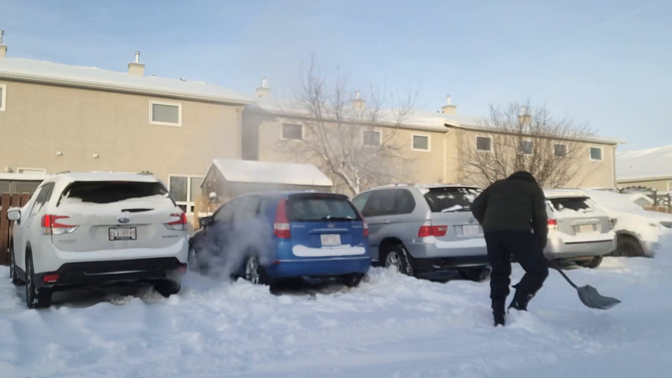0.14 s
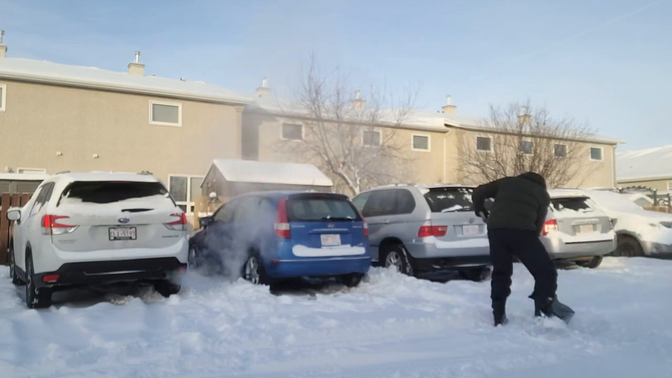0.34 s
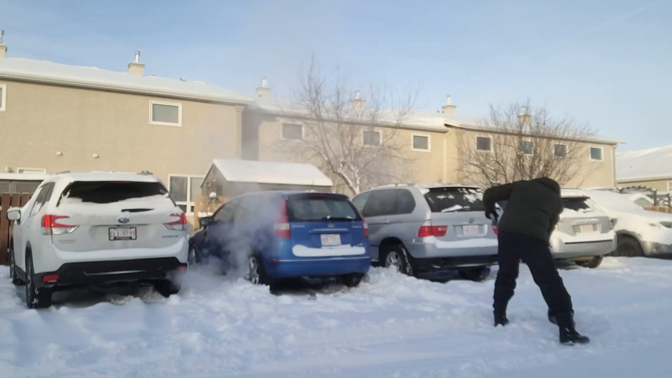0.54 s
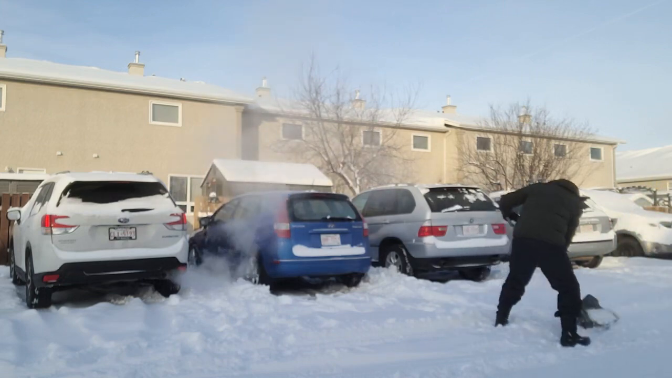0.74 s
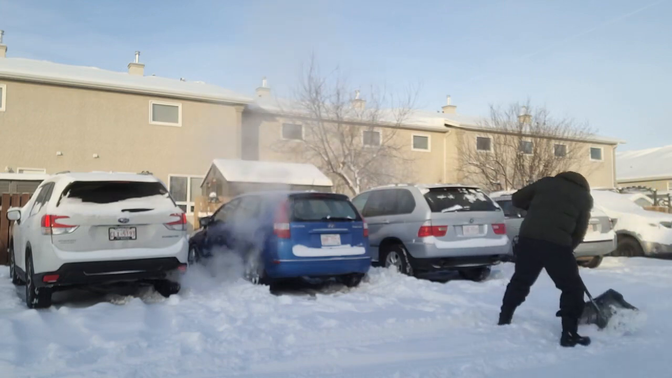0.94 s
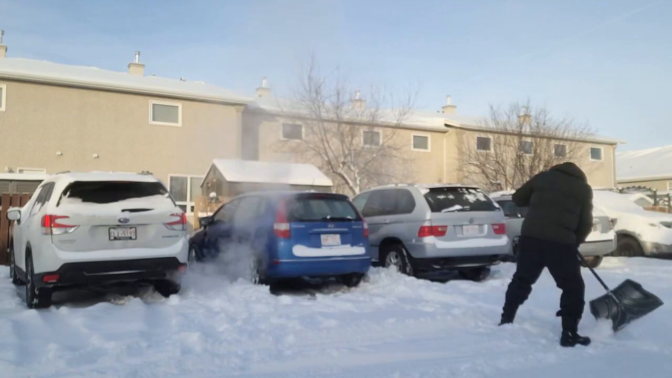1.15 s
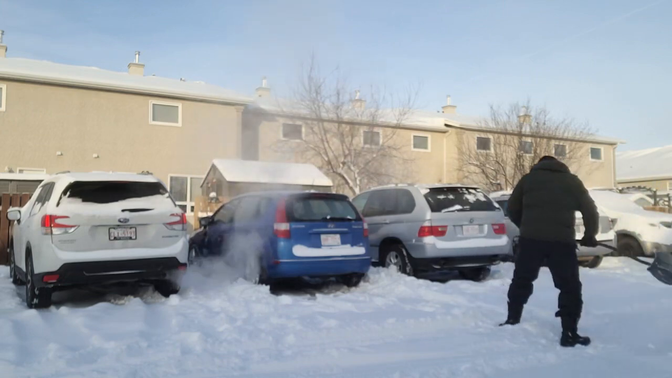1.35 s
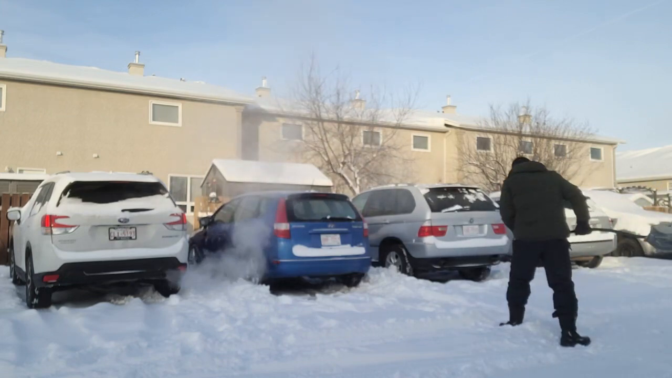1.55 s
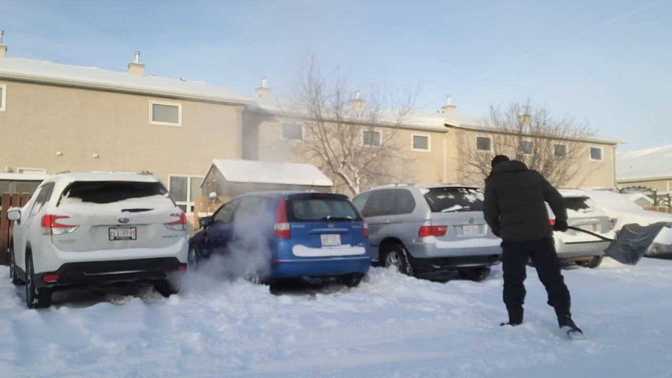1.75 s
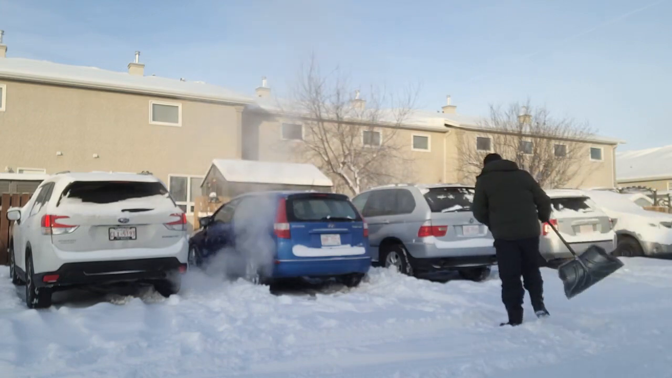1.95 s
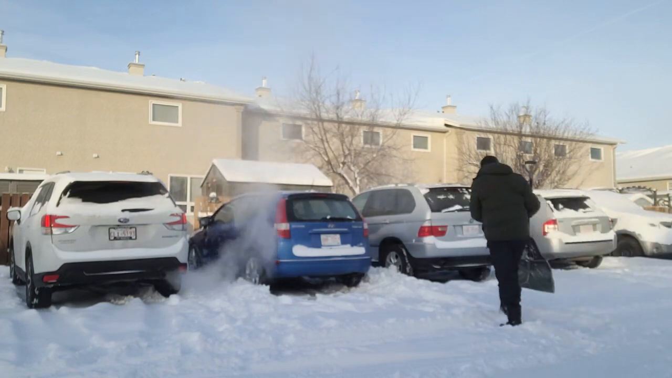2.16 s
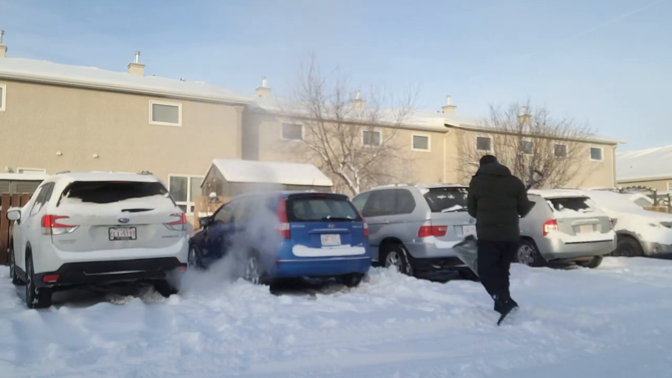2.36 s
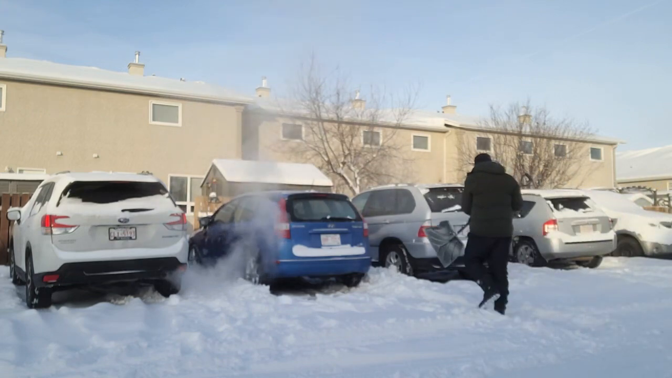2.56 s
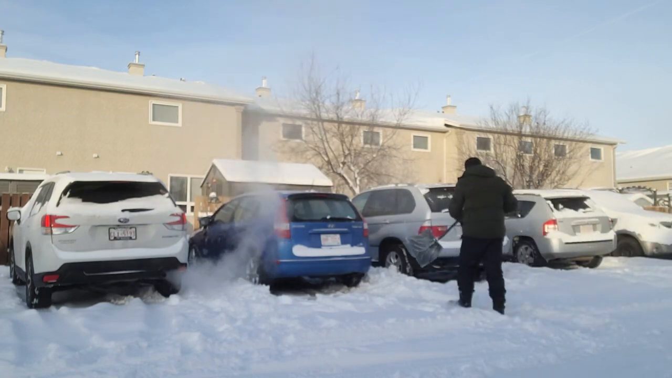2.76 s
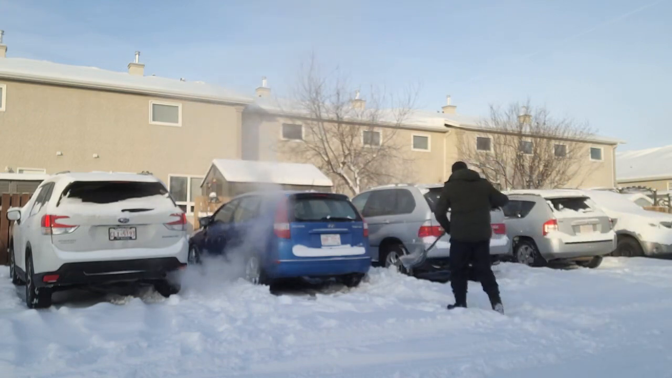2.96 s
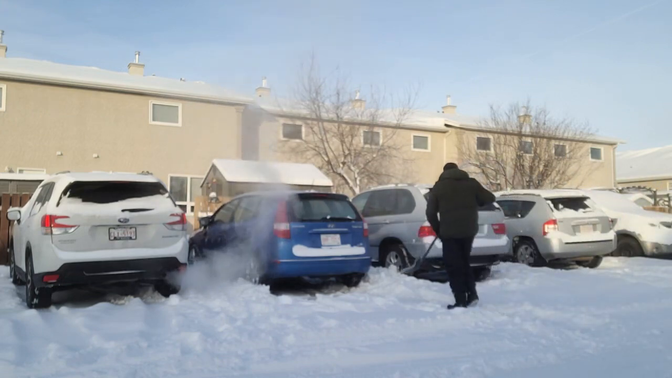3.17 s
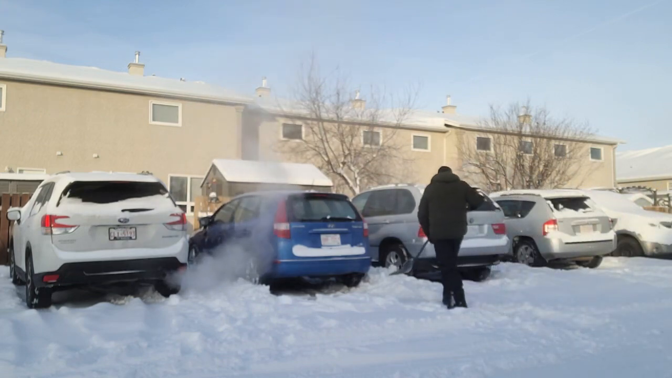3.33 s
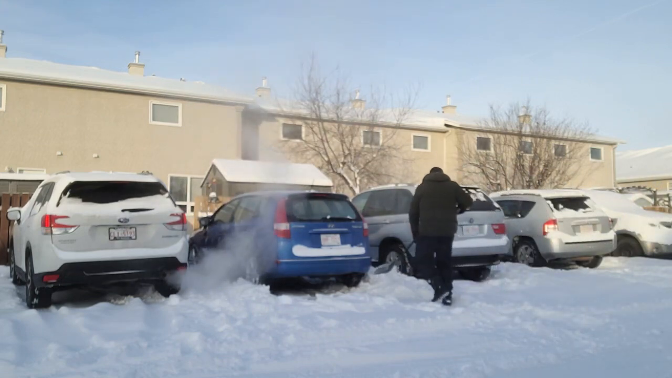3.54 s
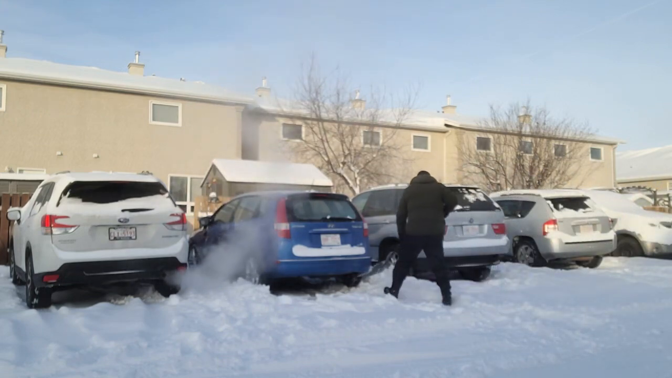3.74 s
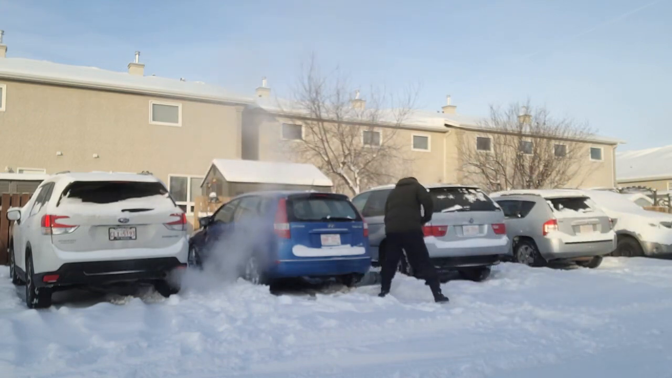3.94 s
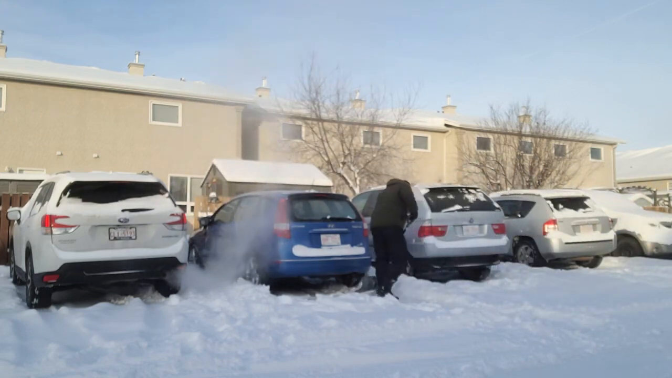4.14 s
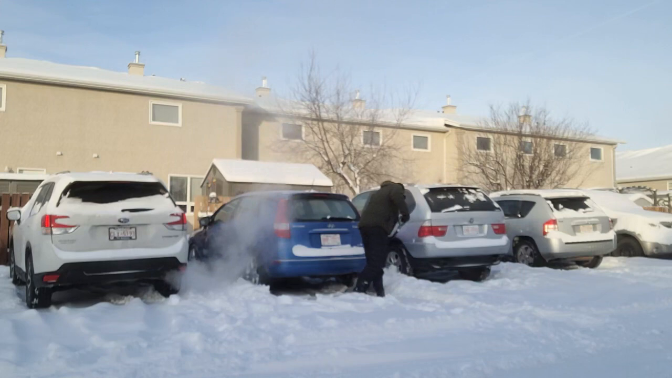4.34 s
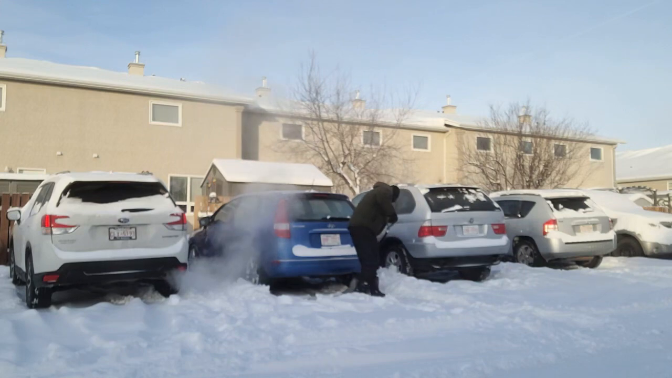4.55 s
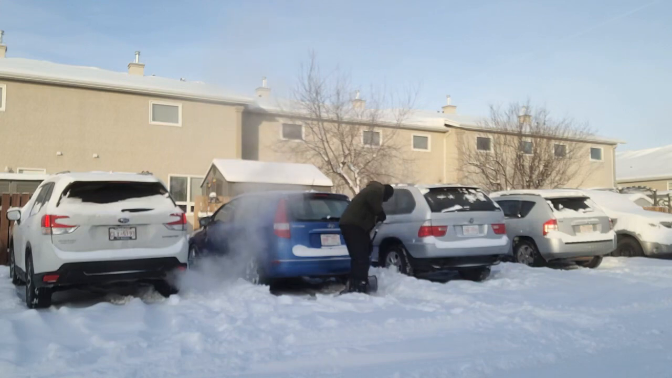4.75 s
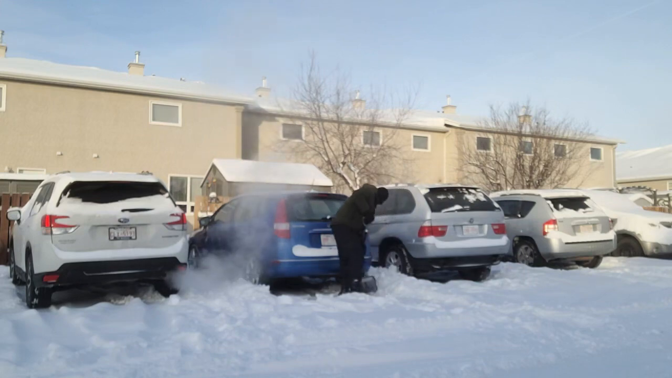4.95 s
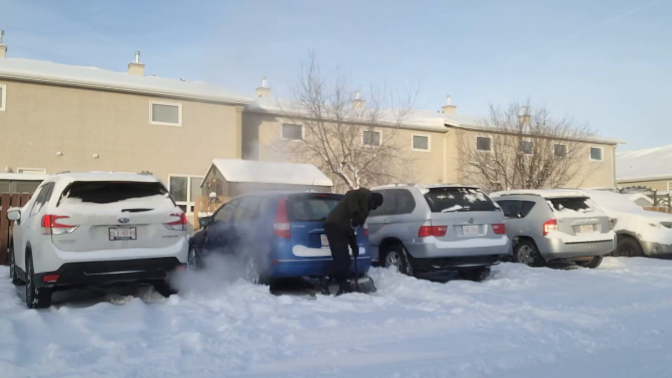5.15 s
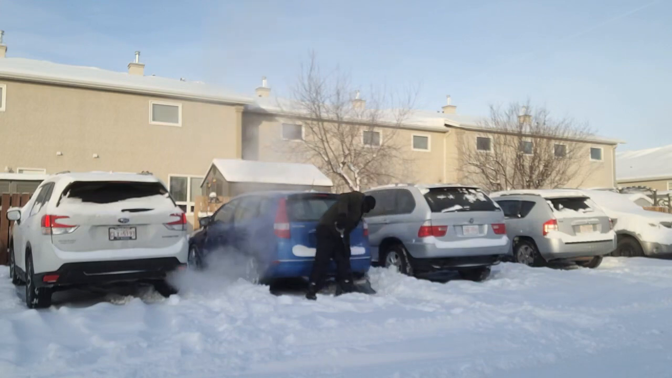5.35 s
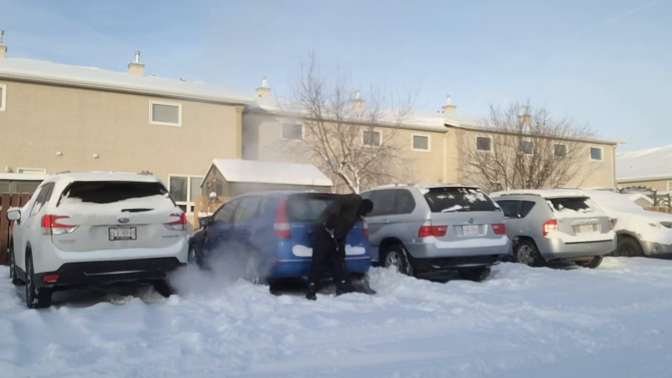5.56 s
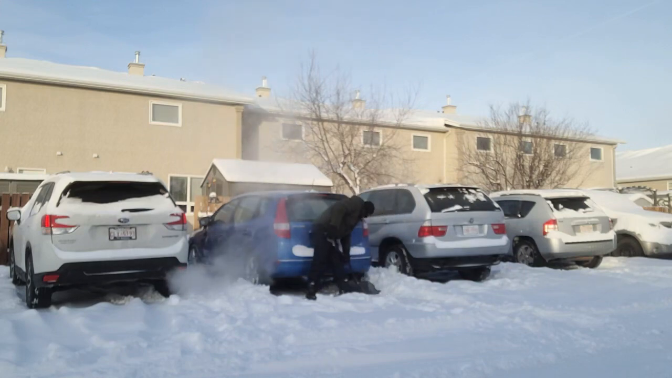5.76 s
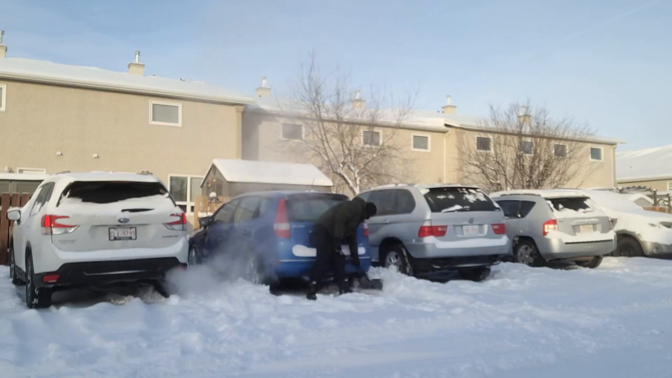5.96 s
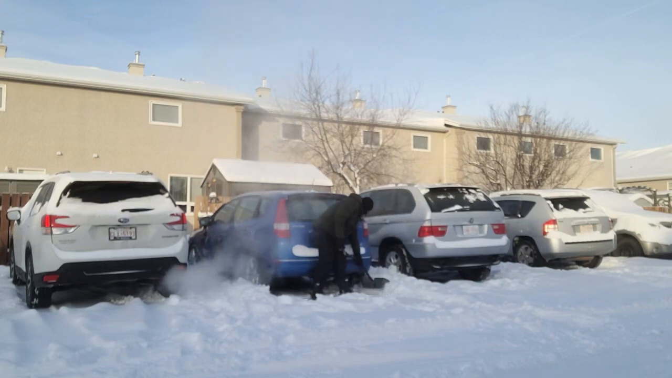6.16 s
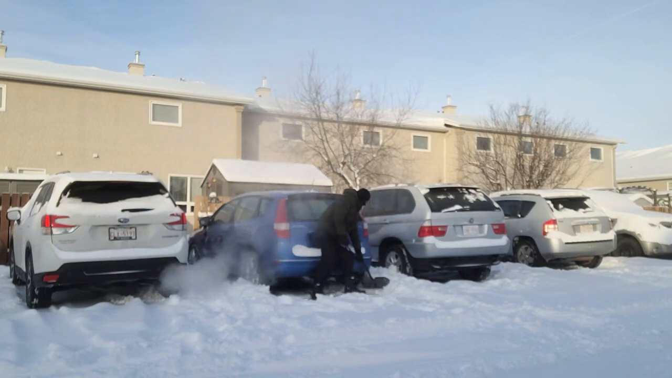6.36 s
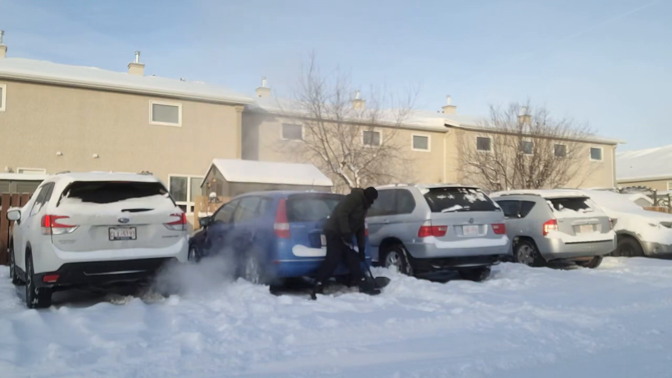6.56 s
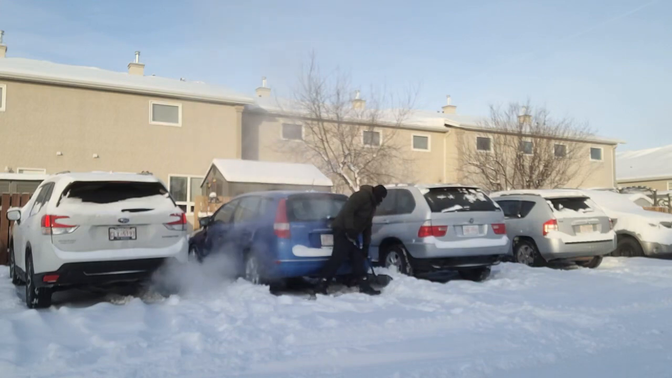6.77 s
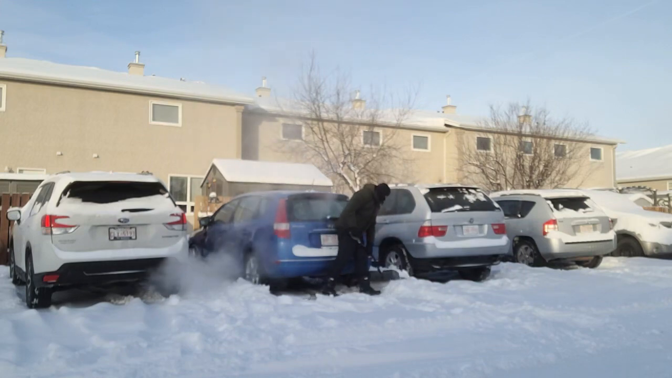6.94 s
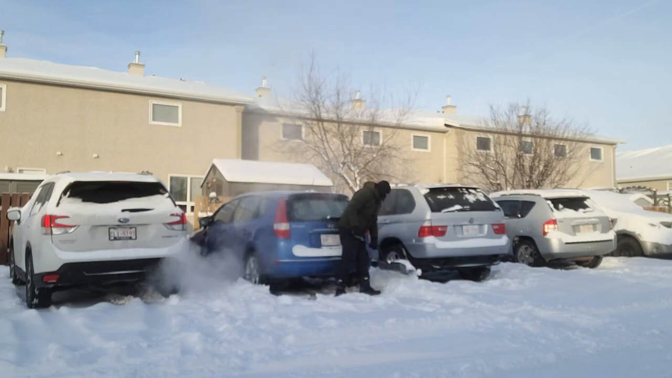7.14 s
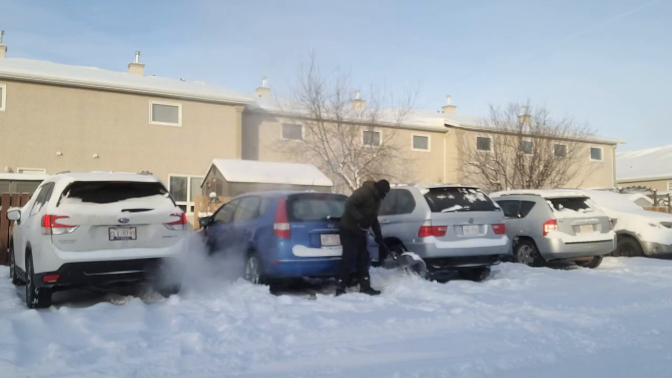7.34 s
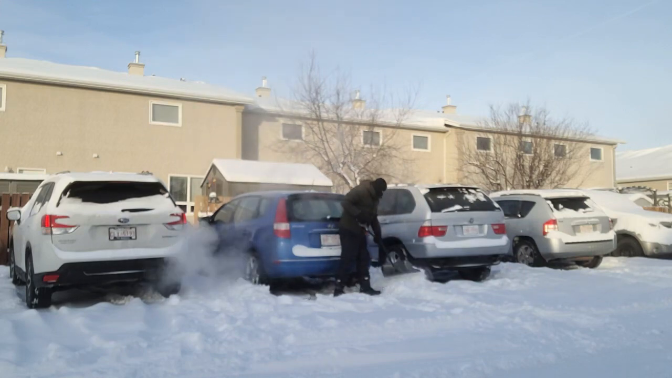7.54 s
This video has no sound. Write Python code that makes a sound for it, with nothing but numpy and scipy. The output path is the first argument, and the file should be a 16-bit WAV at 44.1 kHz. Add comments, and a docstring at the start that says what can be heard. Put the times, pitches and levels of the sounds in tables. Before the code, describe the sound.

Heavy snow shoveling in uneven strokes, hollow plastic groans, crisp crunching and small knocks, over the low burbling exhaust of a nearby idling car.

```python
"""A plastic snow shovel works packed snow in a car park, some metres away, beside an idling car.
A long push makes the loaded blade groan and short jabs chop the crust: filtered noise, shaped by force.
Between them come light scrapes, falling crystals, knocks, squeaks and boot steps, made of noise bursts.
The exhaust hums in steady tones and burbles in pulsing noise; a soft wash of air lies behind.
House fronts return a faint echo of the work, made with a fading noise tail."""
import sys
import numpy as np
from scipy import signal
from scipy.fft import rfft, irfft, next_fast_len
from scipy.io import wavfile
from scipy.ndimage import uniform_filter1d, map_coordinates

SR = 44100
rng = np.random.default_rng(int(sys.argv[2]) if len(sys.argv) > 2 else 0)


def dump(signal):
    """Clip the signal to [-1, 1] and save it as 16-bit WAV at the path in sys.argv[1]."""
    limited = np.clip(np.atleast_2d(signal).T, -1, 1)
    pcm = np.round(limited * 32767).astype(np.int16)
    wavfile.write(sys.argv[1], SR, pcm)


N = 335160
TIME = np.arange(N) / SR  # seconds

# All levels in the tables are relative; the functions trim them further.
# the blade shoves a load of snow, stalls and shoves on: (start [s], bite [s], stop [s], release [s],
# rise of force [dB], blade at the stop [dB], crunch at the stop [dB], powder hiss at the stop [dB])
PUSHES = [(0.596, 0.054, 0.966, 0.59, 1.35, -31, -37.5, -42.5),
          (1.03, 0.099, 1.188, 0.086, 6, -35, -36, -41)]
# blade pressed down under a load of snow: (pitch [Hz], width [Hz], level [dB])
LOADED_BLADE = [(159, 22, -8), (206, 23, -1), (285.4, 25, 8), (414, 21, -2), (478, 14, -24), (587, 11, -9),
                (660, 8.8, -33), (690, 17, -36), (945, 22, -41), (1383, 40, -20)]
# colour of the crust breaking in a push: (frequency [Hz], level [dB])
PUSH_CRUNCH = [(470, -34), (800, -14), (963, -13), (1260, -9), (1410, -0.5), (1760, -4), (1960, 5),
               (2890, -1.5), (3280, 2.5), (5390, -1), (6750, -5), (7440, -1), (8200, -11), (10700, -47.5),
               (18000, -120)]


def push():
    """A heavy load damps and retunes the blade, so it groans while the crust crunches."""
    return stroke(PUSHES, LOADED_BLADE, PUSH_CRUNCH, blade_db=.5, crunch_db=-0.9, powder_db=3.5, patchy_db=2.8)


# short jabs chop the crust: (start [s], bite [s], stop [s], release [s],
# rise of force [dB], blade at the stop [dB], crunch at the stop [dB], powder hiss at the stop [dB])
JABS = [(5.663, 0.021, 5.73, 0.081, 4, -40, -38.5, -43), (5.735, 0.061, 5.9, .29, 3.8, -34.5, -35.5, -36)]
# blade ringing freely, in jabs and knocks: (pitch [Hz], width [Hz], level [dB])
FREE_BLADE = [(167, 38, -1.5), (227, 31, 3.5), (330, 54, -11.5), (442, 160, -19), (566, 37, -12.5),
              (655, 19, -5), (878, 20, -7), (1170, 44, -15), (1336, 45, -21.5), (1553, 40, -8.5),
              (1700, 29, -16)]
# colour of the crust breaking in a jab: (frequency [Hz], level [dB])
JAB_CRUNCH = [(470, -38), (800, -19), (865, -14), (1040, -10), (1140, 1), (1230, -5), (1610, 1.5),
              (2730, -4), (2890, -11.5), (3690, -7), (4190, -9.5), (4710, 0.5), (8200, -4.5), (10700, -39),
              (18000, -120)]


def jabs():
    """Quick thrusts break the crust while the blade is free to ring."""
    return stroke(JABS, FREE_BLADE, JAB_CRUNCH, blade_db=-0.5, crunch_db=-0.5, powder_db=3.0, patchy_db=2.0)


# colour of sliding or landing powder, in strokes, sweeps and patter: (frequency [Hz], level [dB])
POWDER = [(6500, -40), (8000, -14), (8800, -7), (10000, -0.5), (11200, 1.5), (13000, 2), (15800, 4.5)]


def stroke(rows, modes, crust, blade_db, crunch_db, powder_db, patchy_db):
    """The edge slips and shakes the blade, crust breaks ahead of it, powder slides over the plastic."""
    blade, crunch, powder = sum(thrust(row) for row in rows)
    judder = snow(body(modes), rate=2200, scatter_db=3.0, life=0.0015, clump_db=1.0)
    # steady pressure on the handle keeps the judder going at an even strength
    judder_power = uniform_filter1d(judder.mean(0) ** 2, size=SR // 30)
    judder = judder / np.sqrt(np.abs(judder_power) + 1e-6)
    breaking = snow(colour(crust), rate=5300, scatter_db=1.5, life=0.0018, clump_db=0.47)
    breaking = gritty(breaking, patchy_db)
    sliding = snow(colour(POWDER), rate=9800, scatter_db=3.0, life=0.00081, clump_db=.7)
    shaking = amp(blade_db) * blade * judder
    return shaking + amp(crunch_db) * crunch * breaking + amp(powder_db) * powder * sliding


BLADE_GROWTH = 2.65  # dB of blade shudder for each dB of force on the handle


def thrust(row):
    """Gains of blade, crunch and powder: the edge bites, force builds up to the stop, then lets go."""
    start, bite, stop, release, rise_db, blade_db, crunch_db, powder_db = row
    contact = np.sin(np.pi / 2 * np.clip((TIME - start) / bite, 0, 1)) ** 2
    build_db = -rise_db * np.clip((stop - TIME) / (stop - start), 0, 1)
    let_go_db = -60 * np.clip((TIME - stop) / release, 0, 2)
    force_db = build_db + let_go_db
    return contact * amp([blade_db + BLADE_GROWTH * force_db, crunch_db + force_db, powder_db + force_db])


# the rasp climbs as the blade fills with snow, then falls, and holds its last value:
# (time [s], centre [Hz], strength [dB])
RASP = [(0.6, 2290, 2), (0.8, 2300, 7.5), (0.88, 3500, 3.5), (0.96, 4870, 2), (1.13, 3570, 0.5),
        (1.18, 2480, 7), (1.3, 3290, 7)]


def gritty(x, patchy_db):
    """Each patch of crust rings at its own pitches, under a broad rasp that moves in pitch."""
    hz, t, z = signal.stft(x, SR, nperseg=512)
    # a smooth random map: each patch spans a few frequency bands and some moments
    patch = np.outer(signal.get_window("hann", Nx=4), signal.get_window("hann", Nx=20))
    field = signal.fftconvolve(rng.standard_normal(z.shape[1:]), patch, "same")
    s, centre_hz, strength_db = np.transpose(RASP)
    octaves = np.log2((hz[:, None] + 1) / np.interp(t, s, centre_hz))
    # lift the pitches near the centre and lower the rest
    rasp_db = np.interp(t, s, strength_db) * (np.exp(-(octaves / 0.38) ** 2) - .4)
    shaped = z * amp(patchy_db * field / field.std() + rasp_db)
    return unit(signal.istft(shaped, SR, nperseg=512)[1][:, :N])


# quick sweeps and spills of loose snow:
# (time of the peak [s], rise [s], fall [s], crunch level [dB], powder hiss level [dB])
SWEEPS = [ (0.05, 0.23, 0.32, -73, -69), (0.5, 0.18, 0.19, -64.5, -59), (1.32, 0.15, 0.12, -56.5, -57.5),
          (1.845, .015, .025, -73, -61), (2.08, 0.3, .35, -67.5, -66), (2.51, 0.071, 0.083, -62.5, -62),
          (2.653, .018, 0.02, -53.5, -59), (3.19, 0.074, 0.042, -55, -57), (3.35, .06, .06, -71, -69),
          (3.96, 0.091, 0.11, -62.5, -69), (4.15, 0.011, 0.017, -54, -59),
          (4.21, 0.045, 0.08, -56.5, -61.5), (4.365, .025, 0.064, -56, -59),
          (4.52, 0.058, 0.042, -57.5, -61.5), (4.61, .04, 0.054, -59, -63),
          (5.98, 0.035, 0.087, -51.5, -52), (6.3, 0.18, 0.18, -64, -66.5), (6.66, 0.17, 0.099, -60, -59.5),
          (6.93, 0.082, 0.1, -63, -63), (7.497, .009, 0.047, -50.5, -53), (7.58, .05, .08, -59, -59), ]
# one long, light drag through loose snow: (time [s], crunch level [dB], powder hiss level [dB])
DRAG = [(4.87, -78, -88), (4.894, -65, -73), (4.976, -53.5, -56), (5.136, -50, -58), (5.186, -50, -51),
        (5.226, -55, -62), (5.508, -51.5, -55), (5.552, -61, -67), (5.66, -63, -68)]
# colour of loose snow crunching: (frequency [Hz], level [dB])
SOFT_CRUNCH = [(650, -3), (1100, -1), (1220, -3), (1620, 0.5), (1880, 0.5), (2400, -0.5), (3090, -7.5),
               (3250, -9.5), (5080, 1), (5860, -5), (6870, -0.5), (8200, -5), (10700, -29), (18000, -120)]


def sweeps(crunch_db, powder_db, drag_crunch_db, drag_powder_db):
    """Loose snow rustles under light passes that leave the blade still."""
    # separate rustles add up as powers
    passes = sum(np.outer(amp(levels), swell(s, rise, fall)) ** 2 for s, rise, fall, *levels in SWEEPS)
    drag = amp([[drag_crunch_db], [drag_powder_db]]) * gains(DRAG)
    crunch, powder = np.sqrt(passes + drag ** 2)
    breaking = snow(colour(SOFT_CRUNCH), rate=2700, scatter_db=2.5, life=0.0015, clump_db=0.7)
    breaking = gritty(breaking, patchy_db=2.2)
    sliding = snow(colour(POWDER), rate=4900, scatter_db=0.5, life=0.00058, clump_db=1.6)
    return amp(crunch_db) * crunch * breaking + amp(powder_db) * powder * sliding


SWEEP_DROP_DB, SWEEP_ROUNDNESS = 9, 1.26  # drop after one rise or fall time; 1 = pointed, 2 = bell


def swell(s, rise, fall):
    """A gain that grows to 1 at s and fades again."""
    away = np.maximum((s - TIME) / rise, (TIME - s) / fall)
    return amp(-SWEEP_DROP_DB * np.minimum(away, 10) ** SWEEP_ROUNDNESS)


# snow thrown off the blade patters down: (time of the middle [s], half length [s], level [dB])
PATTER = [(0.397, 0.12, -60), (2.03, .2, -69)]


def patter():
    """Thrown crystals land one by one with tiny bright ticks."""
    shower = sum(amp(db) * swell(s, half, half) for s, half, db in PATTER)
    return shower * snow(colour(POWDER), rate=150, scatter_db=4, life=0.0007, clump_db=1.5)


# the blade edge hits hard crust:
# (time [s], hit level [dB], blade ring relative to the hit [dB], time to fall by 60 dB [s])
KNOCKS = [ (1.176, -27, -6, 0.14), (1.463, -34, -23, .05), (1.47, -30.5, -10, .085),
          (4.113, -35, -30, 0.033), (5.684, -37, -9, 0.1), (5.71, -32, 0, 0.1), (5.825, -26, 3.5, 0.094),
          (5.855, -32, 0, 0.11), (5.895, -29.5, -3, .1), (6.819, -29.5, -9, 0.094), (6.831, -36, 6, .085),
          (7.486, -36.5, -9, .1), ]
# small ice crumbs snap: (time [s], level [dB])
CRUMBS = [(0.358, -35), (1.732, -34), (1.84, -43), (2.039, -37), (3.18, -37), (4.35, -34), (6.19, -34)]
# colour of cracking ice: (frequency [Hz], level [dB])
CRACK = [(150, -28), (500, -15), (1100, 11.5), (2200, 3.5), (5000, 3), (7600, -2.5), (8600, -8.5),
         (11500, -5), (15800, -0.5)]


def knocks(crack_db, ring_db, crumb_db, crumb_t60):
    """Each hit cracks the crust and rings the blade; crumbs only tick."""
    hits = [amp(db) * burst(s, t60) for s, db, ring, t60 in KNOCKS]
    shake = sum(hit * amp(row[2]) for hit, row in zip(hits, KNOCKS))
    ticks = sum(amp(db) * burst(s, crumb_t60) for s, db in CRUMBS)
    cracks = struck(amp(crack_db) * sum(hits) + amp(crumb_db) * ticks, colour(CRACK))
    return cracks + amp(ring_db) * struck(shake, body(FREE_BLADE))


def burst(s, t60):
    """A gain that jumps up at s and dies away by 60 dB every t60 seconds, down to -120 dB."""
    age = np.maximum(TIME - s, 0)
    return (1 - np.exp(-age / 0.00078)) * amp(-60 * np.minimum(age / t60, 2))


def struck(force, response):
    """Crushed ice under a force curve, sounding through a response."""
    grit = rng.standard_normal((2, N))
    # how loud steady grit would come out, so that the force alone sets the level
    steady = np.sqrt(np.mean(np.abs(response(np.linspace(0, SR / 2, num=4096))) ** 2))
    return spread(force * grit, response, SHOVEL_SIDE) / steady


# boots and clods press the snow, and in some rows the blade groans or thumps under its load: # (time of the
# middle [s], level [dB], half length [s], pitch [Hz], width [octaves])
STEPS = [ (0.058, -44, 0.0085, 290, 0.75), (0.268, -45, .008, 286, 0.66), (0.905, -40, .018, 700, .3),
         (0.963, -35.5, 0.016, 405, 0.24), (1.162, -37, 0.027, 466, 1), (1.348, -38, .022, 307, .8),
         (1.675, -46, .037, 327, 1.57), (2.103, -39, 0.014, 240, 0.85), (2.17, -41, 0.012, 270, .55),
         (2.312, -47.5, 0.022, 327, 0.95), (2.844, -50, .035, 268, 0.38), (2.947, -42, 0.016, 256, 0.52),
         (3.363, -51.5, 0.057, 272, 0.57), (3.828, -47.5, 0.032, 245, 0.49), (3.96, -51, 0.043, 1150, 1.75),
         (4.012, -49, 0.016, 268, 0.7), (4.923, -50, .05, 308, 0.88), (5.875, -33, .024, 250, .5),
         (6.842, -35, .011, 215, .9), (7.025, -48.5, 0.017, 312, 0.5), (7.154, -53, .03, 310, 0.42), ]
# the edge squeaks briefly on ice:
# (time of the middle [s], level [dB], half length [s], pitch [Hz], width [octaves])
SQUEAKS = [ (0.785, -47, 0.021, 2000, .12), (0.84, -49, 0.039, 2340, 0.13), (0.95, -44.5, .024, 5440, .06),
           (1.16, -45, .02, 2050, .16), (2.655, -59, .011, 5370, .3), (5.28, -57, .035, 2320, .13),
           (5.47, -54, .033, 5150, .14), (5.48, -59, .03, 1740, .08), (5.712, -44, 0.013, 2230, .095), ]


def creaks(rows, level_db):
    """Cold snow gives way in a run of tiny slips: low and dull under a boot, thin and high under the edge."""
    slips = grains(rate=2100, scatter_db=5.0, life=0.00044, clump_db=1.0)
    out = np.zeros((2, N))
    for s, db, half, hz, octaves in rows:
        press = np.exp(-np.minimum(((TIME - s) / half) ** 2 / 2, 20))
        edges_hz = hz * 2 ** (np.array([-.5, .5]) * octaves)
        band = signal.butter(2, edges_hz, "bandpass", fs=SR, output="sos")
        creak = signal.sosfilt(band, slips * press)
        # give each creak the energy of its press
        out += amp(db) * creak * np.linalg.norm(press) / np.linalg.norm(creak[0])
    return spread(out, lambda hz: amp(level_db), SHOVEL_SIDE)


# how fast the echo dies at each pitch: (frequency [Hz], time to fall by 60 dB [s])
HOUSES = [(200, 0.4), (2000, 0.37), (12000, 0.26)]


def houses(x):
    """Cars and house fronts scatter a faint tail, in which the treble dies first."""
    hz, t, z = signal.stft(rng.standard_normal((2, SR // 2)), SR, nperseg=256)
    fade = amp(-60 * t / along(HOUSES, hz)[:, None])
    tail = signal.istft(z * fade, SR, nperseg=256)[1]
    late = np.pad(x, ((0, 0), (SR // 100, 0)))  # the tail starts 10 ms late
    return signal.fftconvolve(late, tail / np.linalg.norm(tail[0]), axes=1)[:, :N]


# engine speed: (time [s], firing rate [Hz])
IDLE = [(0, 58.94), (3.3, 58.97), (5, 59.02), (6.3, 58.65), (7.6, 58.67)]
# exhaust tones: (multiple of the firing rate, level [dB])
EXHAUST = [(1, -38.5), (2, -39.5), (4, -70), (4.5, -81), (5, -70), (7, -70), (9, -65), (12, -72.5),
           (20, -88), (28, -84), (30, -76.5)]
# colour of the rough exhaust gas: (frequency [Hz], level [dB])
BURBLE = [(15, -28), (29, -11), (42, 4), (75, 8), (100, 3.5), (150, 4), (195, -4.5), (240, 3), (300, -5.5),
          (370, -12), (480, -46), (800, -41)]


def engine(hum_db, burble_db, sway, uneven_db, throb):
    """The engine fires nearly evenly; each firing also puffs rough gas out of the pipe."""
    firing_hz = np.interp(TIME, *np.transpose(IDLE)) * (1 + sway * wobble(9))
    phase = 2 * np.pi * np.cumsum(firing_hz) / SR
    pipe_lag = 1.09  # radians
    hum = 0
    for k, db in EXHAUST:
        # the pipe delays each overtone differently, which rounds the pulse off
        lag = pipe_lag * k * (k - 1)
        hum = hum + amp(db + uneven_db * wobble(8.3)) * np.cos(k * phase + lag)
    surge = amp(1.2 * wobble(16))
    puffs = (1 + throb * np.cos(phase)) * surge * rng.standard_normal((2, N))
    burble = unit(spread(puffs, colour(BURBLE), AIR_SIDE))
    hum_lean = amp([[-.9], [.9]])  # a little louder on the right
    return amp(hum_db) * hum * hum_lean + amp(burble_db) * burble


# colour of the background wash: (frequency [Hz], level [dB])
AIR = [(200, -5), (400, -3), (520, -6), (650, -7), (800, -11), (1000, -9.5), (1300, -13.5), (1750, -14.5),
       (2400, -17), (3300, -23), (5000, -22), (7500, -26), (8400, -39), (11500, -30), (15800, -32.5)]


def air(level_db):
    """The even wash of the engine bay and the town, as noise that drifts slightly in level."""
    wash = unit(spread(rng.standard_normal((2, N)), colour(AIR), AIR_SIDE))
    drift_db = .25 * wobble(2) + .45 * wobble(25)
    return amp(level_db + drift_db) * wash


def snow(response, rate, scatter_db, life, clump_db):
    """Breaking snow of rms 1, heard through a response."""
    return unit(spread(grains(rate, scatter_db, life, clump_db), response, SHOVEL_SIDE))


def grains(rate, scatter_db, life, clump_db):
    """Snow crystals break, rate a second: bursts of uneven size, life seconds long, that come in clumps."""
    breaks = (rng.random(N) < rate / SR) * amp(scatter_db * rng.standard_normal(N)) ** 2
    power = signal.lfilter([1], [1, -np.exp(-1 / (life * SR))], breaks)
    clumps = amp(clump_db * wobble(110))
    return unit(np.sqrt(power) * clumps * rng.standard_normal((2, N)))


# left-right likeness, 1 = the same: (frequency [Hz], shovel, surroundings)
ALIKE = [(130, 1, 0.89), (283, 0.96, 0.89), (640, 0.42, 0.16), (1420, 0.5, 0), (3000, 0.36, 0),
         (7000, 0.21, 0), (15000, 0.11, 0.066)]
# left minus right: (frequency [Hz], shovel [dB], surroundings [dB])
LEAN = [(60, -8, -8.5), (200, -1.5, -1), (700, 1.5, 0), (1300, 0, -1), (2400, 2.5, 1.5), (4400, 4, 1),
        (8100, 8.5, 1), (15000, 6.5, 5.5)]
SHOVEL_SIDE = (np.array(ALIKE)[:, :2], np.array(LEAN)[:, :2])
AIR_SIDE = (np.array(ALIKE)[:, ::2], np.array(LEAN)[:, ::2])


def spread(x, response, side):
    """Two unrelated signals become a coloured stereo pair: bass alike, treble apart."""
    alike, lean_db = side

    def mix(hz):
        turn = np.arccos(np.clip(along(alike, hz), -1, 1)) / 2
        lean = amp(np.outer([.5, -.5], along(lean_db, hz)))
        same, apart = np.cos(turn), np.sin(turn)
        return response(hz) * lean[:, None] * np.array([[same, apart], [same, -apart]])
    return filtered(x, mix).sum(1)


def off_axis(x, lead_ms):
    """Sound from the side arrives on the left first."""
    return filtered(x, lambda hz: np.exp(1j * np.pi * np.outer([1, -1], hz) * lead_ms / 10 ** 3))


def body(modes):
    """The response of a set of resonances."""
    return lambda f: sum(amp(db) * 1j * f * w / (c * c - f * f + 1j * f * w) for c, w, db in modes)


def colour(points):
    """The response of a (frequency [Hz], level [dB]) spectrum."""
    return lambda hz: amp(along(points, hz))


def filtered(x, response):
    """Pass x through a complex response of frequency."""
    m = next_fast_len(N + SR // 4)
    return irfft(rfft(x, m) * response(np.fft.rfftfreq(m, 1 / SR)), m)[..., :N]


def along(points, hz):
    """Read (frequency [Hz], value) points on a log frequency axis."""
    f, v = np.transpose(points)
    return np.interp(np.log(hz + 1), np.log(f + 1), v)


def gains(rows):
    """One gain per sample for each dB column, silent outside the rows."""
    s, *cols = np.transpose(rows)
    inside = uniform_filter1d(1.0 * ((TIME >= s[0]) & (TIME <= s[-1])), size=400)
    return [inside * amp(np.interp(TIME, s, c)) for c in cols]


def wobble(rate):
    """A smooth random curve through rate random points a second."""
    return map_coordinates(rng.standard_normal(int(N * rate / SR) + 4), [TIME * rate])


def amp(db):
    """Decibels to gain."""
    return 10 ** (np.asarray(db) / 20)


def unit(x):
    """Scale so that the mean of the channels has rms 1."""
    return x / np.sqrt(np.mean(np.atleast_2d(x).mean(0) ** 2) + 1e-20)


def scene():
    """Shovel and boots with their echo, over the idling car."""
    work = off_axis(push(), lead_ms=0.22) + jabs()
    work = work + sweeps(crunch_db=0.5, powder_db=3.5, drag_crunch_db=0.2, drag_powder_db=2.0) + patter()
    work = work + knocks(crack_db=-7.5, ring_db=-5.0, crumb_db=-10, crumb_t60=0.015)
    work = work + creaks(STEPS, level_db=-1.5) + creaks(SQUEAKS, level_db=0.0)
    # snow on the ground swallows most of the echo
    echo = amp(-19) * houses(work)
    car = engine(hum_db=2.5, burble_db=-48.5, sway=0.00083, uneven_db=0.1, throb=0.22)
    return work + echo + car + air(level_db=-55.5)


TOP_HZ = 15870


def record(dry):
    """Nothing is kept from TOP_HZ upwards."""
    return filtered(dry, lambda hz: hz < TOP_HZ)


dry = scene()
out = record(dry)
dump(out)
```